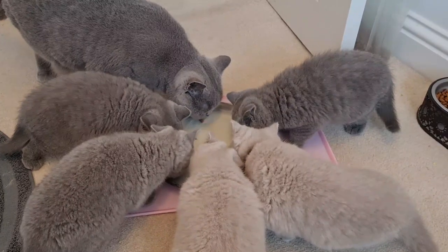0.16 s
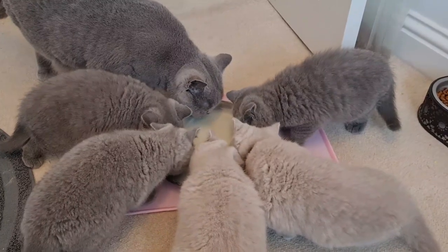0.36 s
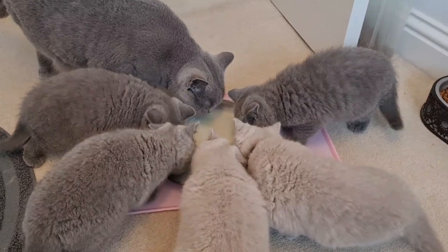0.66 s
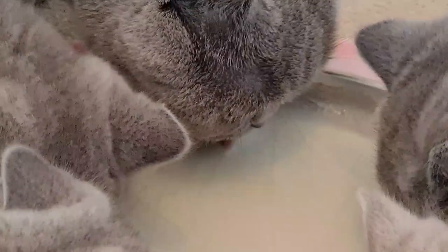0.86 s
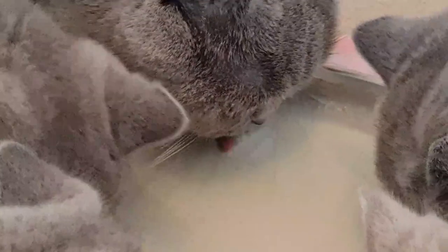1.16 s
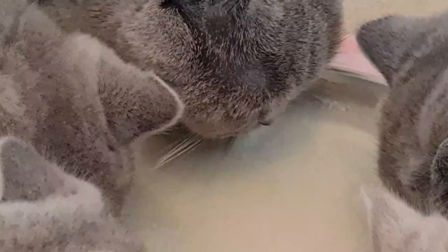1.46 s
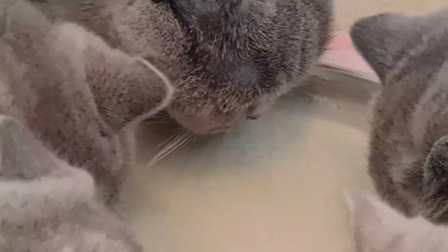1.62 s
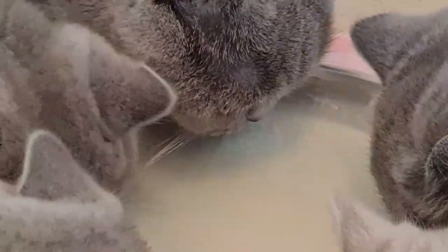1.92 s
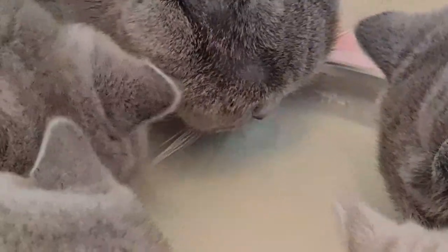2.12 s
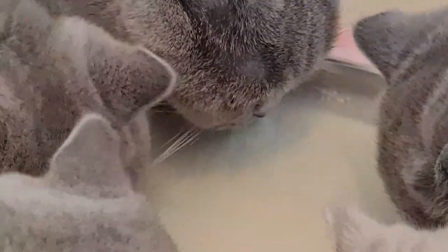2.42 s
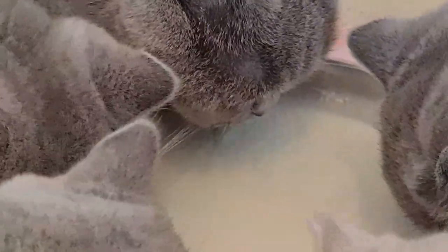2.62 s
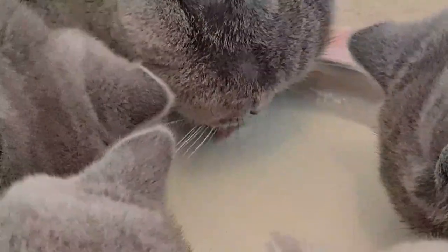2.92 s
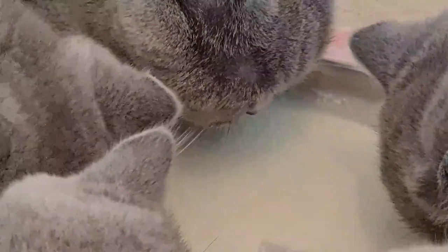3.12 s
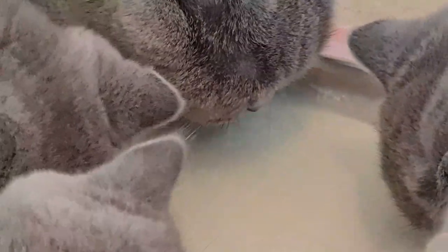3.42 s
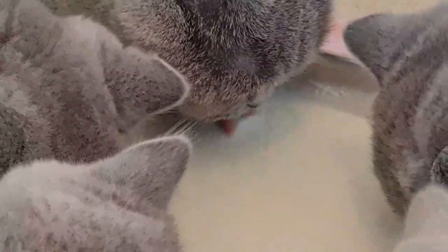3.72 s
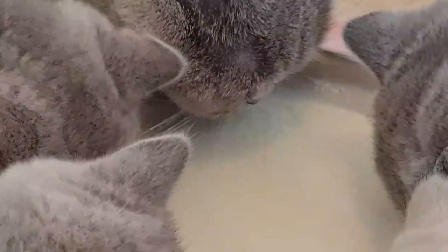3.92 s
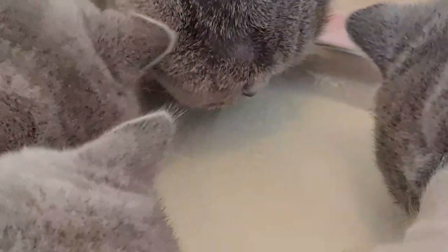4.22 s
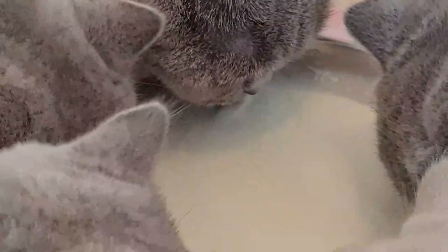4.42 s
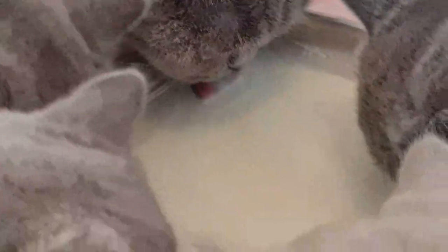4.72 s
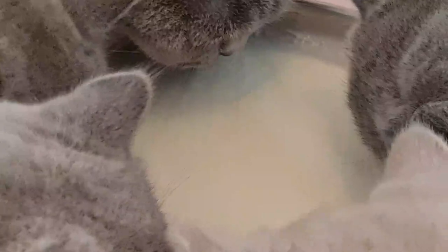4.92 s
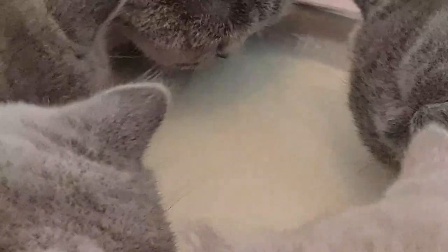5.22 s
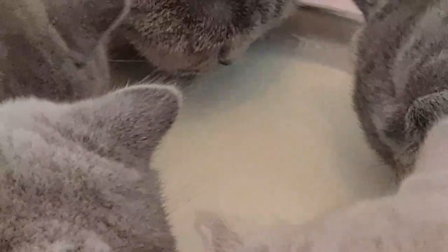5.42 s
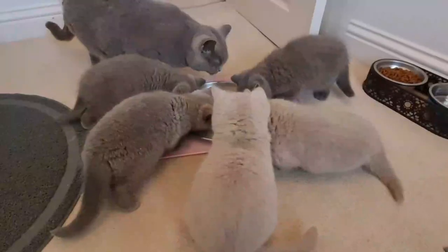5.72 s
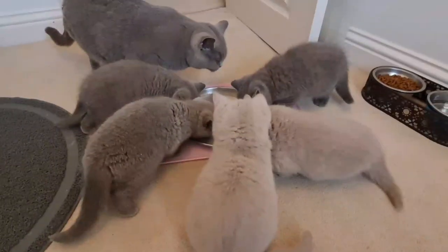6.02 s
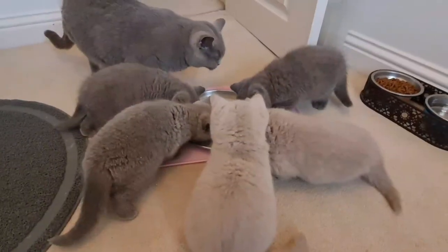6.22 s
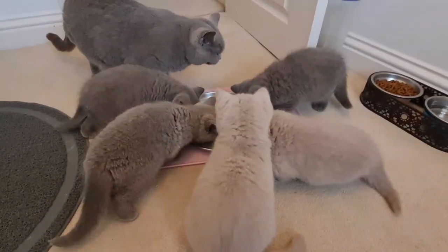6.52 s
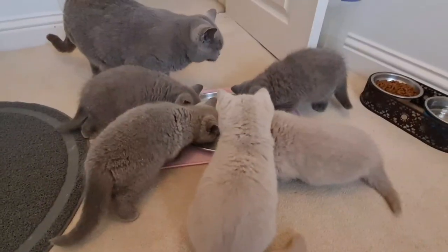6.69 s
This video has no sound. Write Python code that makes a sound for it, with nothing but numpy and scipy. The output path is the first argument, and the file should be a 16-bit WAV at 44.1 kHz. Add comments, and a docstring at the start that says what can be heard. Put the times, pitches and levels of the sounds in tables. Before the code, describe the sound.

Close handheld stereo microphone beside a shared milk dish: many small tongues click and pop quickly, some hollow, some thin and bright, scattered left and right. A steady electrical hum with slow wavering throb is stronger through the middle. Finger friction brushes the right side early and again faintly around six seconds, before low bumps and a sharp wet click.

```python
"""A cat and kittens lap milk from one dish in a small hard-floored room, close to a hand-held phone.
From the start, pitched tongue pops and wet smacks sound over faint ticks, and the room throws them back.
Between 1.2 and 1.8 s there are soft thumps and a finger rubs the right microphone port; a throbbing
appliance hum swells as the phone nears the dish. After 5.8 s the hum sinks and the deep boom grows;
the finger brushes again just after 6 s, and two last low thumps come near 6.7 s."""
import sys
import numpy as np
from scipy import signal
from scipy.fft import rfft, irfft
from scipy.io import wavfile
from scipy.ndimage import uniform_filter1d

SR = 44100
rng = np.random.default_rng(int(sys.argv[2]) if len(sys.argv) > 2 else 0)


def int16_out(signal):
    """Quantize to a 16-bit WAV file."""
    q = np.round(np.clip(np.atleast_2d(signal).T, -1, 1) * 32767)
    wavfile.write(sys.argv[1], SR, q.astype(np.int16))


N = 302330
TIME = np.arange(N) / SR


def amp(db):
    """Turns decibels into a gain."""
    return 10 ** (np.asarray(db) / 20)


def unit(x):
    """Scales a sound to an rms (average strength) of 1."""
    return x / np.sqrt(np.mean(x ** 2) + 1e-20)


def curve(rows, column=1):
    """Draws straight lines between the rows of a time table, giving a value at every sample."""
    rows = np.asarray(rows)
    return np.interp(TIME, rows[:, 0], rows[:, column])


def read(points, hz):
    """Reads a frequency table, with straight lines between points on a log-frequency axis."""
    f, value = np.transpose(points)
    return np.interp(np.log(hz + 1), np.log(f + 1), value)


def colour(x, gain):
    """Filters a sound by a gain given as a function of frequency."""
    hz = np.fft.rfftfreq(x.shape[-1], 1 / SR)
    return irfft(rfft(x) * gain(hz), x.shape[-1])


def shaped(x, points):
    """Filters a sound by a table of decibels against frequency, then sets its rms to 1."""
    return unit(colour(x, lambda hz: amp(read(points, hz))))


def drift(rate_hz):
    """Makes a slow random wander of rms 1 by keeping only the slowest part of noise."""
    return unit(colour(rng.standard_normal(N), lambda hz: np.exp(-(hz / rate_hz) ** 2)))


def ring(x, hz, q):
    """Rings one damped resonance; a higher q rings longer."""
    b, a = signal.iirpeak(min(hz, SR / 2 - 2000), max(q, 1), SR)
    return signal.lfilter(b, a, x)


def add(mix, s, sound):
    """Mixes a sound in at time s, cutting off whatever runs past the end."""
    part = mix[..., max(round(s * SR), 0):][..., :sound.shape[-1]]
    part += sound[..., :part.shape[-1]]


def ports(x, side_db):
    """Sound reaches the right port a little later than the left, and at its own level."""
    late = np.roll(x, 4)  # 4 samples, about 0.09 ms
    return np.array([x * amp(side_db / 2), late * amp(-side_db / 2)])


def room(x, wet_db, first_s=0.0025):
    """Floor and walls send back dense, dying reflections, different at each port."""
    # Each row: frequency in Hz, time in seconds for the echo to fall by 60 dB
    decay_times = [(300, 0.38), (1000, 0.2), (4000, 0.25), (8000, 0.2), (15000, 0.15)]
    t = np.arange(SR // 2) / SR
    struck = rng.random((2, len(t))) < 4000 / SR  # about 4000 reflections a second
    fade_in = np.clip(t / first_s - 1 / 2, 0, 1)
    taps = rng.standard_normal((2, len(t))) * struck * fade_in
    # each pitch dies at its own pace
    hz, age, z = signal.stft(taps, SR, nperseg=256)
    decay = amp(-60 * age / read(decay_times, hz)[:, None])
    tail = signal.istft(z * decay, SR, nperseg=256)[1]
    tail /= np.linalg.norm(tail, axis=1, keepdims=True)
    return amp(wet_db) * signal.fftconvolve(x[None], tail, axes=1)[:, :N]


def pop(hz, snap_db, q=5.8, suck=0.26, release_s=0.0014, snap_s=0.00075):
    """A film of milk breaks and rings the mouth cavity for a few cycles, with a broad snap."""
    t = np.arange(1024) / SR
    burst, snap = rng.standard_normal((2, len(t)))
    kick = (t == 0) + suck * burst * np.exp(-t / release_s)  # one click plus a short noisy suck
    tone = ring(ring(kick, hz, q), hz, q / 2)
    snap = ring(snap * np.exp(-t / snap_s), np.sqrt(hz * 5000), 1)  # pitched midway to 5000 Hz
    return (unit(tone) + amp(snap_db) * unit(snap)) / 2


def laps(level_db=-0.65, trail_db=-11.5, trail_s=0.049, scatter_octaves=0.18, count=3,
         wet_db=0.5, touch_db=-12, touch_cycles=11):
    """The tongue touches with a faint tick, then pops; smaller ticks trail as strands of milk part."""
    # The clearest tongue pops. Each row: time of the pop in seconds, level in dB before the shared trim,
    # pitch of the mouth cavity in Hz, broad snap in dB relative to the pop, left minus right in dB
    lap_rows = [(0.275, -64.5, 1910, -13, 0), (0.38, -72.5, 1700, -15, -4), (0.43, -66.5, 1930, -15, 3),
                (0.586, -73, 6160, -15, -17), (0.881, -73, 7640, -8, -11), (1.193, -69.5, 10000, 9, -6),
                (1.321, -73, 890, -1, 0), (1.359, -68.5, 868, -8, 0), (1.427, -71, 6360, 4, 14),
                (1.654, -63.5, 4510, -11, -10.5), (1.787, -77, 1270, 11, -9), (1.912, -73, 2330, 1, 7),
                (1.986, -68.5, 1440, -4, 3), (2.077, -73.5, 6430, 4.5, 6), (2.108, -74.5, 7830, 0, -9),
                (2.141, -72, 3730, -5, 15), (2.246, -64, 802, -4, -1), (2.328, -65, 4380, -10, 9.5),
                (2.399, -63, 1193, -5.5, 0), (2.415, -67.5, 1940, -17, 1), (2.51, -65.5, 3150, -14, 13),
                (2.528, -65, 4400, -18, 10), (2.583, -72, 6260, 0, -11), (2.787, -70, 4380, 0, 4),
                (2.855, -71.5, 2480, -24, 10), (2.904, -68, 913, -26, -11), (3.054, -79, 2800, 3, 8),
                (3.109, -69, 3960, 5.5, -3), (3.155, -81, 2120, 6, 10), (3.233, -73.5, 4000, 0, 22),
                (3.344, -77.5, 2440, -12, 3), (3.421, -69, 3030, 2, 2), (3.511, -73, 850, -0.5, -9),
                (3.614, -76.5, 4450, 2.5, 3), (3.65, -78.5, 4800, -15, 21), (3.703, -71.5, 3300, -2.5, 10),
                (3.736, -76, 3550, -14, 1), (3.779, -77, 7700, -12, -18), (3.783, -71.5, 826, -10, -4),
                (3.88, -83, 2510, 10, 11), (3.965, -73.5, 850, 4, 5), (4.087, -70, 12000, -15, -13),
                (4.159, -74, 4520, 0.5, 11), (4.239, -67.5, 835, -0.5, 2), (4.313, -62.5, 660, -33, 0),
                (4.349, -60, 796, -9.5, 4), (4.373, -71.5, 2280, -11, 15), (4.38, -75, 630, -20, 2),
                (4.448, -76.5, 2200, -16, 0), (4.5, -75, 4420, -18, 13), (4.61, -75, 1325, -24, 20),
                (4.743, -67, 13400, -12, -17), (4.77, -68, 2210, -9, 6), (4.854, -75, 2360, -15, 4),
                (4.934, -61, 7730, -5.5, 8.5), (4.97, -69, 2820, 0, 2), (5.005, -64, 7500, -22, 14),
                (5.1, -78.5, 6600, 6, 8), (5.156, -63.5, 9360, -9, 14), (5.206, -77.5, 3660, -4, 19),
                (5.308, -77, 2030, 2.5, 0), (5.387, -71.5, 6800, -12, -1), (5.555, -73.5, 6860, -7, -13),
                (5.589, -60.5, 2410, -5, 10), (5.605, -65.5, 3300, -21, 2), (5.658, -67, 4630, -8, 11),
                (5.758, -74, 4160, -8, 8), (5.847, -73.5, 670, -1, 0), (5.977, -72, 8700, -7, 24),
                (6.001, -71, 950, -7, 14), (6.04, -68.5, 670, -20, 6), (6.143, -73.5, 3860, 5.5, -8),
                (6.275, -67.5, 990, -19, -6), (6.324, -73, 1620, -18, -4), (6.455, -72.5, 4360, -4, 2),
                (6.721, -57.5, 7900, -2, 9), (6.84, -71, 8030, -6, -4)]
    centre, near = np.zeros(N), np.zeros((2, N))
    for s, db, hz, snap_db, side_db in lap_rows:
        lap = np.zeros(8192)
        lead_s = touch_cycles / hz  # the deeper the pitch, the longer the wait from touch to pop
        add(lap, 0, amp(touch_db) * pop(hz, snap_db))
        add(lap, lead_s, pop(hz, snap_db))
        for wait, pitch in zip(rng.random(count), rng.standard_normal(count)):
            strand = pop(hz * 2 ** (scatter_octaves * pitch), snap_db)
            add(lap, lead_s + wait * trail_s, amp(trail_db) * strand)
        lap *= amp(db + level_db)
        add(centre, s - lead_s, lap)
        add(near, s - lead_s, ports(lap, side_db))
    return near + room(centre, wet_db)


def kittens(count=7, laps_per_s=3.2, level_db=-80.0, spread_db=2.5, low_hz=1700, high_hz=7500,
            apart_s=.09, snap_db=-5):
    """Several loose rhythms of faint double ticks overlap; both ticks of a pair share one mouth pitch."""
    out = np.zeros(N)
    for _ in range(count):
        gaps = rng.uniform(.7, 1.3, 30)  # uneven steps, as a share of the average beat
        beats = (np.cumsum(gaps) - rng.random()) / laps_per_s
        for s in beats:
            hz = low_hz * (high_hz / low_hz) ** rng.random()
            for wait in (0, apart_s * rng.random()):
                tick_db = level_db + spread_db * rng.standard_normal()
                add(out, s + wait, amp(tick_db) * pop(hz, snap_db))
    return out


def smacks(level_db=0.52, grains_per_s=1800, grain_db=5.0, rise_share=0.11, fizz_sharpness=1.6):
    """Lips and tongue part: a dying clump of saliva clicks, part ringing in the mouth, part fizzing."""
    # Each row: start in seconds, mouth level and saliva fizz level in dB before fading and later trims,
    # centre of the fizz in Hz, fading time in seconds
    smack_rows = [(0.132, -69, -86, 4000, 0.017), (0.254, -66, -74, 8400, 0.039),
                  (0.385, -65.5, -71, 4160, 0.025), (0.424, -68, -69, 6440, 0.025),
                  (0.65, -68.5, -70, 9000, 0.022), (0.794, -70.5, -63.5, 8500, 0.035),
                  (1.059, -70, -78, 5100, 0.042), (1.189, -60, -51, 9800, 0.01),
                  (1.253, -59.5, -60, 6800, 0.0077), (1.362, -57, -58, 6150, 0.0031),
                  (1.443, -87, -75.5, 8580, 0.13), (2.17, -70.5, -70, 7840, 0.04),
                  (2.579, -61, -65.5, 5560, .009), (2.687, -75, -68, 7800, 0.009),
                  (3.116, -64.5, -82, 7000, 0.02), (4.746, -75.5, -66.5, 11000, 0.011),
                  (5.972, -73, -58.5, 9450, 0.0062), (6.227, -79, -72, 8750, 0.049),
                  (6.575, -75.5, -73, 8300, 0.042), (6.718, -64.5, -54, 5900, 0.024)]
    # Tone of the mouth. Each row: frequency in Hz, relative level in dB per Hz
    mouth_tone = [(700, -8.5), (1400, -14), (1650, -4.5), (1950, -2), (2300, -4.5), (2800, -9),
                  (3400, -7.5), (4300, -2.5), (5200, -35.5), (9000, -19)]
    out, t = np.zeros(N), np.arange(8192) / SR
    for s, mouth_db, fizz_db, fizz_hz, length in smack_rows:
        present = rng.random((2, len(t))) < grains_per_s / SR
        clicks = rng.standard_normal((2, len(t))) * present
        clicks *= amp(grain_db * np.minimum(rng.exponential(1, clicks.shape), 3))  # a few stand out

        def fizz_gain(hz):
            ratio = (hz / fizz_hz) ** 2
            return (ratio * np.exp(-ratio)) ** fizz_sharpness
        fizz = unit(colour(clicks[1], fizz_gain))
        wet = amp(mouth_db) * shaped(clicks[0], mouth_tone) + amp(fizz_db) * fizz
        swell = (1 - np.exp(-t / (rise_share * length))) * np.exp(-t / length)
        add(out, s, amp(level_db) * wet * swell)
    return out


def finger(leak_db=-27, grain=0.052, bright_hz=2500, bright_power=1.22):
    """Skin slides over the right port: friction noise swells with speed, the treble more sharply."""
    # Each row: time at the height in seconds, half length in seconds, level in dB, pressure from 0 to 1
    rub_rows = [(1.575, 0.015, -30, 0.93), (1.609, 0.066, -57, 0.57), (1.818, 0.032, -47, 0.02),
                (6.03, 0.095, -67, 0.4), (6.149, 0.01, -52.5, 1), (6.297, 0.13, -66.5, 0.4)]
    # A firm swipe, then a light drag. Each row: frequency in Hz, relative level in dB per Hz
    firm_tone = [(40, -58), (100, 3.5), (170, -3), (330, 0.5), (480, -3), (560, -10.5), (870, -11.5),
                 (1100, -23), (2600, -22), (3200, -28), (5000, -24), (7700, -18), (8700, -27.5),
                 (15500, -24)]
    light_tone = [(100, -7), (270, -1), (500, -13.5), (700, -9), (1150, -10.5), (1600, -12), (2200, -23),
                  (7500, -31.5), (9400, -49), (15500, -43)]
    out = np.zeros(N)
    for s, half, db, pressure in rub_rows:
        t = np.arange(-8192, 8192) / SR
        roughness = unit(uniform_filter1d(rng.standard_normal(len(t)), 60))
        slips = rng.standard_normal((2, len(t))) * np.exp(grain * roughness)
        share = np.clip(pressure, 0, 1)
        firm, light = shaped(slips[0], firm_tone), shaped(slips[1], light_tone)
        skin = np.sqrt(share) * firm + np.sqrt(1 - share) * light
        dull = colour(skin, lambda hz: 1 / (1 + (hz / bright_hz) ** 2))
        bright = skin - dull
        speed = 1 / np.cosh(np.clip(1.66 * t / half, -50, 50))
        add(out, s + t[0], amp(db) * (dull * speed + bright * speed ** bright_power))
    return out * amp([[leak_db], [0]])  # only a little leaks to the left


def thumps():
    """Dull low bumps: each is a sine wave that swells and dies within a few cycles."""
    # Each row: start in seconds, level in dB, pitch in Hz, rise time in seconds, left minus right in dB
    thump_rows = [(1.195, -50, 82, 0.012, -5), (1.562, -38, 195, 0.0032, -23),
                  (6.722, -44.5, 127, 0.022, 2), (6.74, -39.5, 72, 0.017, 1.5)]
    out, t = np.zeros((2, N)), np.arange(SR // 3) / SR
    for s, db, hz, rise, side_db in thump_rows:
        swell = t / rise * np.exp(1 - t / rise)
        bump = amp(db) * swell * np.sin(2 * np.pi * hz * t)
        add(out, s, ports(bump, side_db))
    return out


def appliance(hum_db=-1.0, hum_waver_db=2.2, throb_swell_db=4.0):
    """Mains hum and a thin fan tone; a low motor tone beats with a narrow rumble and follows the hum."""
    # Hum, swelling as the phone nears the dish. Each row: time in seconds, level in dB before trim and waver
    hum_level = [(0.03, -55.5), (0.07, -55), (1.03, -58.5), (1.3, -53.5), (1.35, -44.5), (5.84, -46),
                 (6.24, -51.5), (6.83, -51.5)]
    # Each row: time in seconds, left minus right of the hum in dB
    hum_side = [(0, 9), (1.15, 12), (1.35, 3), (5.9, 3), (6.3, 3.5), (6.86, 5.5)]
    # Each row: multiple of the hum's pitch, relative level in dB
    overtones = [(1, -3.5), (2, -25.5), (3, -35.5), (6, -43)]
    # Thin fan tone. Each row: time in seconds, level in dB
    whine_level = [(0, -78), (.9, -79), (1.4, -86.5), (5.9, -96.5), (6.4, -83.5), (6.86, -83.5)]
    hum_hz, whine_hz = 99.7, 487.5
    throb_hz, throb_db = 74.3, -9.5  # motor tone; level against the hum table, before its swell
    shudder_hz, shudder_width_hz, shudder_db = 72, 5.4, -8.5  # narrow rumble; level likewise

    def tone(hz):
        cycles = np.cumsum(hz * np.ones(N)) / SR + rng.random()
        return np.sqrt(2) * np.sin(2 * np.pi * cycles)  # rms 1
    swell = np.tanh(drift(rate_hz=10))
    hum = sum(amp(db) * tone(round(k) * hum_hz) for k, db in overtones)
    hum = amp(hum_db + hum_waver_db * swell) * hum
    noise = rng.standard_normal(N)
    shudder = unit(colour(noise, lambda hz: np.exp(-((hz - shudder_hz) / shudder_width_hz) ** 2 / 2)))
    throb = amp(throb_db) * tone(throb_hz) + amp(shudder_db) * shudder
    throb = amp(throb_swell_db * swell) * throb
    whine = amp(curve(whine_level)) * tone(whine_hz + 1.2 * drift(rate_hz=5))  # pitch wanders a little
    sides = amp(np.outer([.5, -.5], curve(hum_side)))
    return amp(curve(hum_level)) * (hum * sides + throb) + whine


def diffuse():
    """Noise from all round: most alike at both ports in the bass, unrelated in the treble."""
    # Each row: frequency in Hz, left-right likeness from 0 to 1
    likeness = [(60, 0.61), (130, 1), (290, 0.63), (640, 0.41), (1400, 0), (3000, 0), (15000, 0)]
    a, b = rng.standard_normal((2, N))

    def same(hz):
        return np.clip(read(likeness, hz), -1, 1)
    right = colour(a, same) + colour(b, lambda hz: np.sqrt(1 - same(hz) ** 2))
    return np.array([a, right])


def background(boom_hz=41, boom_width_hz=6, air_db=-73.53, drone_swell_db=2.0):
    """The lowest room mode booms under a wavering drone and steady air hiss, all made from noise."""
    # Each row: time in seconds, deep boom level in dB, drone level in dB before its waver
    rumble = [(0, -71, -67), (1.1, -69.5, -68.5), (1.4, -65, -61.5), (3.5, -62, -61.5),
              (5.85, -63.5, -61.5), (6.05, -49, -59.5), (6.5, -54, -63.5), (6.86, -52.5, -56.5)]
    # Tone of the drone, then of the air. Each row: frequency in Hz, relative level in dB per Hz
    drone_tone = [(70, -36), (115, -5.5), (135, -10), (170, -18), (225, -13.5), (270, -12), (325, -20),
                  (440, -43.5), (700, -55), (1000, -71)]
    air_tone = [(240, -1), (400, 1.5), (488, 0.5), (543, -2), (595, -2), (653, -3), (1030, -8.5),
                (2400, -11.5), (2630, -16), (4560, -14.5), (5820, -18.5), (7790, -13), (15500, -16.5)]
    boom = unit(colour(diffuse(), lambda hz: hz / boom_hz / (1 + ((hz - boom_hz) / boom_width_hz) ** 2)))
    waver_db = drone_swell_db * drift(rate_hz=5.2)
    drone = shaped(diffuse(), drone_tone) * amp([[.6], [-.6]] + waver_db)  # slightly louder on the left
    air = shaped(diffuse(), air_tone) * amp(air_db)
    return boom * amp(curve(rumble)) + drone * amp(curve(rumble, column=2)) + air


def scene():
    """Adds up the mouths at the dish, their room sound, the finger, thumps, appliance and background."""
    faint, wet = kittens(), smacks()
    ticks = ports(faint, side_db=0.5) + room(faint, wet_db=-5.5)
    wet_sounds = amp(-4.5) * ports(wet, side_db=4.5) + room(wet, wet_db=4.5)
    mouths = laps() + ticks + wet_sounds
    return mouths + finger() + thumps() + appliance() + background()


def record(dry):
    """The phone passes only what lies below its upper band limit."""
    edge_hz = 15750
    lowpass = signal.firwin(511, edge_hz, window=("kaiser", 8), fs=SR)
    return signal.oaconvolve(dry, lowpass[None], "same")


dry = scene()
out = record(dry)
int16_out(out)
```